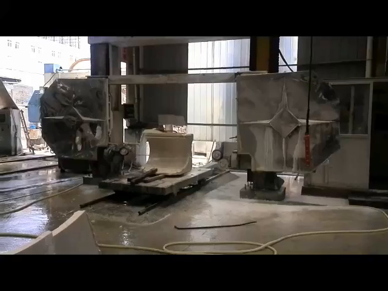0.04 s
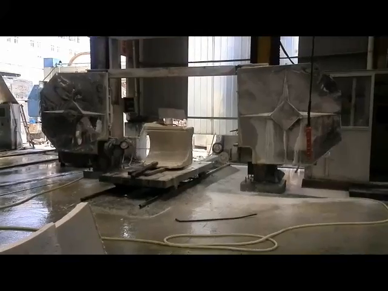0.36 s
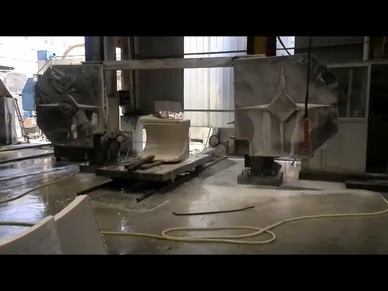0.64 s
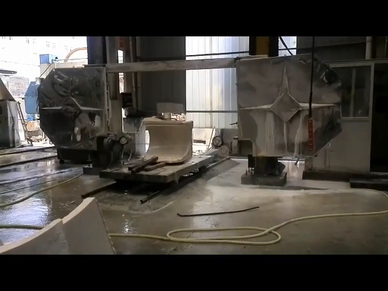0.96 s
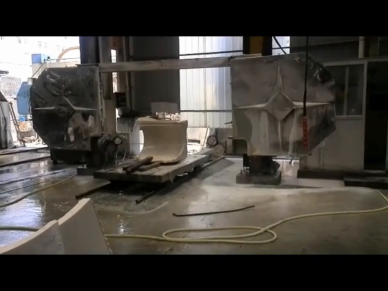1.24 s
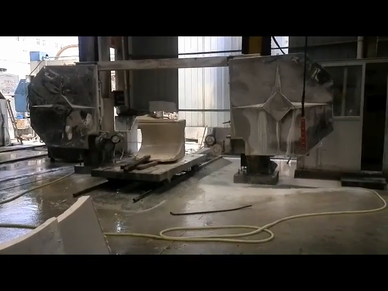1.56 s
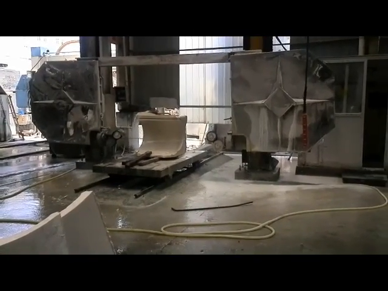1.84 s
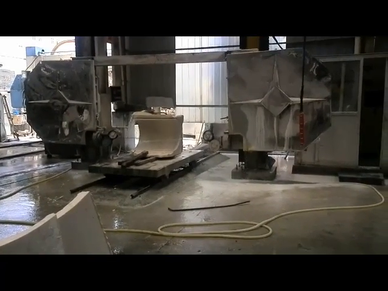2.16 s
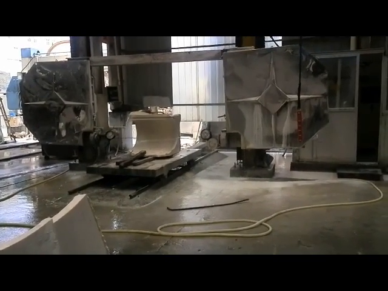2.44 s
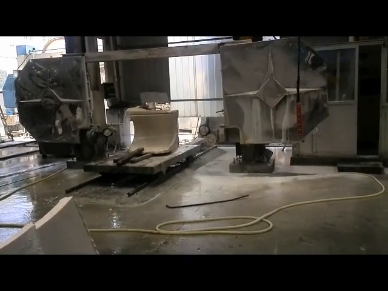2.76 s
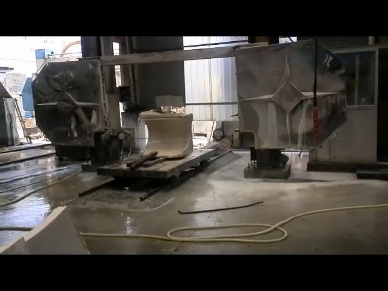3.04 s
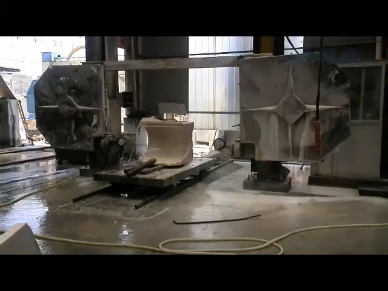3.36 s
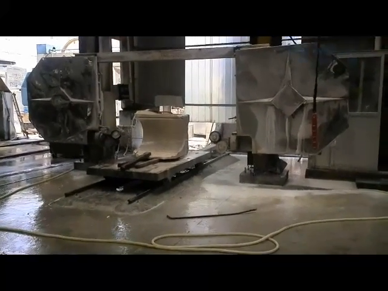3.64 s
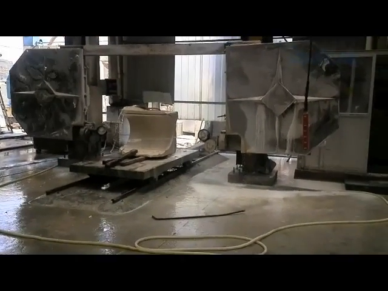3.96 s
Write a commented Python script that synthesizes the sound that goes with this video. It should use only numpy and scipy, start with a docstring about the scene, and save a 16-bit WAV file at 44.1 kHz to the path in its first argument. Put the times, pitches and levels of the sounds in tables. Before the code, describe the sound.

A large wire saw cutting stone comes in right at the start and runs steadily until the end, about 4 seconds. Its grinding roar carries a rough, high whine that holds its pitch but wavers in strength. Cooling water hisses and spatters throughout, over a motor hum and rumbling metal guards. From about 3 seconds a low drone swells slightly. Everything is heard from out in an echoing workshop.

```python
"""A grinding roar and a wavering whine fill a wet, echoing workshop: a big diamond wire saw in a stone
block, heard from out in the room as through a spaced pair of microphones. The wire's beads strike the
stone at a steady rate to make the whine, and tear out grit to make the roar. Cooling water hisses and
spatters out of the cut; underneath, the drive motor hums and the wheel guards rumble."""
import sys
import numpy as np
from scipy import signal
from scipy.fft import rfft, irfft
from scipy.io import wavfile

SR = 44100
rng = np.random.default_rng(int(sys.argv[2]) if len(sys.argv) > 2 else 0)


def digitize_waveform(pressure):
    """Quantize a signal to 16-bit integers and store it at the path in sys.argv[1].

    Rows of a 2-D input are taken as channels; values are limited to [-1, 1].
    """
    field = np.atleast_2d(pressure).T
    bounded = np.clip(field, -1, 1)
    quanta = np.round(bounded * 32767).astype(np.int16)
    wavfile.write(sys.argv[1], SR, quanta)


N = 176400
T = np.arange(N) / SR
FREQS = np.maximum(np.arange(N // 2 + 1) * SR / N, 1)
BEAD_HZ, MOTOR_HZ = 1077.3, 57.5


def from_db(db):
    """Decibels to gain."""
    return 10 ** (np.asarray(db) / 20)


def rms_one(x):
    """Scale to unit power."""
    return x / np.sqrt(np.mean(np.abs(x) ** 2) + 1e-20)


def swing(rows):
    """A level curve in time, in dB about its mean."""
    db = np.interp(T, *np.transpose(rows))
    return db - db.mean()


def over_freqs(rows):
    """Each column of a spectrum table on the frequency grid."""
    hz, *columns = np.transpose(rows)
    return np.array([np.interp(np.log(FREQS), np.log(hz), c) for c in columns])


def drift(rate_hz):
    """A smooth random wander of rms 1 that changes at the given rate."""
    hop, settle = 40, 2000
    pole = np.exp(-2 * np.pi * hop * rate_hz / SR)
    noise = rng.standard_normal(N // hop + settle + 2)
    slow = signal.lfilter([1], [1, -2 * pole, pole * pole], noise)[settle:]
    return np.interp(np.arange(N) / hop, np.arange(len(slow)), rms_one(slow))


def scatter(rate_hz):
    """Random strength and phase of a tone that arrives by many paths; power 1."""
    return (drift(rate_hz) + 1j * drift(rate_hz)) / np.sqrt(2)


def tone(hz, width_hz):
    """A sine of rms 1 whose strength and phase waver, spreading it into a narrow band."""
    path = rms_one(scatter(width_hz))
    return np.sqrt(2) * np.real(path * np.exp(2j * np.pi * (hz * T + rng.random())))


def hall_ripple(depth_db=1.15, spacing_hz=12):
    """Fine peaks and dips that wall reflections leave in the spectrum at each microphone; power 1."""
    knots_hz = spacing_hz * np.arange(1, len(FREQS) // 10 + 1)
    bumps = [rms_one(np.interp(FREQS, knots_hz, rng.standard_normal(len(knots_hz)))) for mic in range(2)]
    return rms_one(from_db(depth_db * np.array(bumps)))


def hall_noise(spectrum, low_hz, high_hz, flicker_db, flicker_hz, bands):
    """Stereo noise out in the hall, in overlapping bands that each flicker by themselves."""
    # how alike the hall sounds at the two microphones: frequency_hz, correlation
    likeness = [(40, 0.68), (200, 0.74), (320, 0.72), (530, -.3), (750, 0.0097), (1100, 0.22), (1550, 0.37),
                (2300, -0.02), (2950, -0.31), (3350, 0.21), (4400, -0.29), (5200, 0.31), (6500, -0.34),
                (8000, -0.041)]
    alike = over_freqs(likeness)[0]
    colour = from_db(over_freqs(spectrum)) * hall_ripple() * np.sqrt(SR / 4)
    colour /= np.sqrt((1 + (low_hz / FREQS) ** 16) * (1 + (FREQS / high_hz) ** 16))
    band_position = np.clip(np.log(FREQS / low_hz) / np.log(high_hz / low_hz), 0, 1) * (bands - 1)
    out = 0
    for k in range(bands):
        mid, side = rfft(rng.standard_normal((2, N)))
        pair = np.sqrt(1 + alike) * mid + np.sqrt(1 - alike) * side * [[1], [-1]]
        window = np.sqrt(np.maximum(1 - np.abs(band_position - k), 0))
        band = irfft(pair * colour * window, N)
        out = out + band * rms_one(from_db(flicker_db * drift(flicker_hz)))
    return out


def grinding(chatter_db):
    """Grit torn from the stone: a broad roar that chatters with the wire."""
    # spectrum of the roar: frequency_hz, left_db, right_db
    spectrum = [(400, -51.6, -51.9), (600, -51.2, -51.5), (740, -47.8, -48.2), (920, -51.5, -51.2),
                (1100, -48.1, -45.4), (1450, -52.3, -49.9), (1750, -51.5, -49.0), (2100, -49.3, -45.8),
                (2500, -51.0, -50.7), (3400, -50.4, -50.7), (4000, -50.8, -51.9), (4800, -50.3, -50.7)]
    # contour of the roar, its swing scaled down below: time_s, level_db
    contour = [(0.1, -22), (0.45, -21.5), (0.51, -23.5), (0.65, -19), (1.25, -23), (1.36, -18),
               (1.47, -21.5), (2.04, -18.5), (2.05, -22.5), (2.23, -16), (2.37, -23), (2.39, -18.5),
               (3.01, -23), (3.4, -19), (3.89, -22), (3.91, -21), (3.98, -22.5), (4.0, -15)]
    roar = hall_noise(spectrum, low_hz=402, high_hz=4710, flicker_db=1.32, flicker_hz=11.7, bands=9)
    return roar * from_db(0.78 + 0.38 * swing(contour) + chatter_db)


def bead_whine():
    """Beads strike the stone in quick succession: a rough whine that fades differently left and right."""
    # how hard the beads bite, taken about its mean: time_s, level_db
    bite = [(.1, -24), (.15, -18.5), (.31, -21), (.37, -25.5), (.5, -22.5), (.68, -31), (.77, -19.5),
            (.93, -29), (.98, -17), (1.3, -35), (1.46, -23), (1.75, -22.5), (1.84, -20.5), (1.93, -30),
            (2.01, -21), (2.15, -31.5), (2.27, -18.5), (2.6, -24), (2.7, -19), (2.9, -20), (3.27, -22.5),
            (3.36, -29), (3.6, -20), (3.8, -21.5), (3.88, -26), (3.94, -14), (4, -23)]
    # partials of the whine: bead_rate_multiple, left_db, right_db, share_of_bite_swing
    partials = [(1, -23, -22, 1), (2, -40, -27, .2), (3, -39, -40, .1)]
    bite_db = swing(bite)
    speed_wander = 0.00082 * drift(rate_hz=1.73)   # share of the wire's speed
    strikes = BEAD_HZ * (T + np.cumsum(speed_wander) / SR)
    out = np.zeros((2, N))
    for multiple, left_db, right_db, bite_share in partials:
        source = from_db(bite_share * bite_db) * np.exp(2j * np.pi * multiple * strikes)
        for mic, db in enumerate((left_db, right_db)):
            hall_fading = 0.29 * scatter(rate_hz=3.8)
            uneven_beads = 0.49 * scatter(rate_hz=32)
            arrival = rms_one(source * (1 + hall_fading + uneven_beads))
            out[mic] += from_db(db) * np.sqrt(2) * np.real(arrival)
    return out


def wire_shake():
    """The motor shakes the wire: weaker wavering tones, whole steps of its rate from the whine."""
    # tones around the whine: bead_rate_multiple, motor_steps (rounded below), left_db, right_db
    side_tones = [(1, -1, -40, -32), (1, 1.5, -43, -50), (1, 1.5, -45, -38), (1, 3, -29, -48),
                  (1, 3, -44, -40), (2, -2, -35, -39), (2, -4, -50, -44), (2, 0.5, -51, -37)]
    out = np.zeros((2, N))
    for multiple, steps, *pair_db in side_tones:
        hz = multiple * BEAD_HZ + round(steps) * MOTOR_HZ
        out += [from_db(db) * tone(hz, width_hz=2.9) for db in pair_db]
    return out


def spray(chatter_db):
    """Water flung from the wire hisses in uneven spurts."""
    # spectrum of the hiss: frequency_hz, left_db, right_db
    spectrum = [(4800, -50.4, -50.8), (5500, -50.4, -48.2), (6100, -49.9, -45.4), (6600, -49.3, -44.9),
                (7600, -50.2, -51.6), (9700, -48.0, -58.5), (10700, -50.0, -60.0), (12000, -55.8, -63.3),
                (13300, -60.9, -68.2), (14000, -71.1, -72.4)]
    # spurts of water, taken about their mean: time_s, level_db
    spurts = [(.1, -12.5), (.5, -13), (1, -12), (1.2, -13.5), (1.5, -12.5), (2.1, -12), (2.7, -13),
              (2.95, -14.5), (3.25, -12.5), (3.45, -12.5), (3.8, -13.5), (4, -13)]
    hiss = hall_noise(spectrum, low_hz=4670, high_hz=16500, flicker_db=1.0, flicker_hz=6.4, bands=6)
    return hiss * from_db(1 + swing(spurts) + chatter_db)


def drops(per_s=610, level_db=-32.5, ring_cycles=10):
    """Drops spatter on the wet floor and the guards, each ringing for a few cycles."""
    out = np.zeros((2, N))
    pitches = np.geomspace(2500, 11000, num=12)
    for hz in pitches:
        size_db = np.minimum(rng.exponential(1, (2, N)), 5)
        sizes = from_db(size_db) * rng.choice([-1, 1], (2, N))
        lands = rng.random((2, N)) < per_s / len(pitches) / SR
        pole = from_db(-60 * hz / (ring_cycles * SR))
        resonance = [1, -2 * pole * np.cos(2 * np.pi * hz / SR), pole * pole]
        out += signal.lfilter([1, 0, -1], resonance, sizes * lands + 1e-18)
    return from_db(level_db) * rms_one(out)


def motor_hum():
    """The drive motor hums in a few low, wavering tones."""
    # tones of the drive: pitch_hz, level_db
    hum = [(26.5, -56), (57.8, -45.5), (115.6, -35), (167, -40), (291, -38.5), (314, -35.5)]
    return sum(from_db(db) * tone(hz, width_hz=3.9) for hz, db in hum)


def wheel_guards():
    """The sheet-metal guards rumble, with a low drone that swells toward the end."""
    # swell of the drone: time_s, level_db
    swell = [(.1, -36), (.85, -36), (1.2, -43), (2.9, -53), (3.2, -26), (3.5, -41), (3.8, -23.5), (4, -28)]
    # spectrum of the rumble: frequency_hz, left_db, right_db
    spectrum = [(20, -67.3, -68.0), (40, -68.4, -67.7), (70, -61.8, -61.9), (95, -51.3, -53.4),
                (135, -51.3, -52.7), (165, -44.5, -44.8), (210, -46.0, -46.6), (270, -46.7, -45.8),
                (310, -45.3, -45.9), (400, -51.5, -51.2)]
    # contour of the rumble, taken about its mean: time_s, level_db
    contour = [(.1, -22), (.55, -21), (1.15, -22.5), (1.5, -23), (2.2, -20.5), (2.6, -21.5), (3, -21.5),
               (3.4, -20.5), (4, -20.5)]
    drone = from_db(np.interp(T, *np.transpose(swell))) * tone(hz=183.5, width_hz=13)
    rumble = hall_noise(spectrum, low_hz=18.2, high_hz=396, flicker_db=1.0, flicker_hz=3.6, bands=7)
    return drone + rumble * from_db(1 + swing(contour))


def scene():
    """The saw in mid-cut; the wire's chatter and the motor's throb move both grinding and spray."""
    uneven_cut_db = 0.6 * drift(rate_hz=24)
    throb_db = 0.25 * tone(MOTOR_HZ, width_hz=1)   # the motor's shaking presses the wire into the cut
    chatter_db = uneven_cut_db + throb_db
    cutting = grinding(chatter_db) + bead_whine() + wire_shake()
    water = spray(chatter_db) + drops()
    return cutting + water + motor_hum() + wheel_guards()


def record(dry):
    """The microphones fade up after a moment of near silence; peaks are rounded and the top is cut."""
    start_s, fade_s, ceiling, stop_hz = 0.054, 0.045, 1.29, 14500
    fade_in = np.clip((T - start_s) / fade_s, 0, 1) ** 3 + from_db(-74)
    rounded = ceiling * np.tanh(dry * fade_in / ceiling)
    lowpass = signal.cheby2(16, 60, stop_hz, fs=SR, output="sos")
    return signal.sosfilt(lowpass, rounded)


dry = scene()
out = record(dry)
digitize_waveform(out)
```